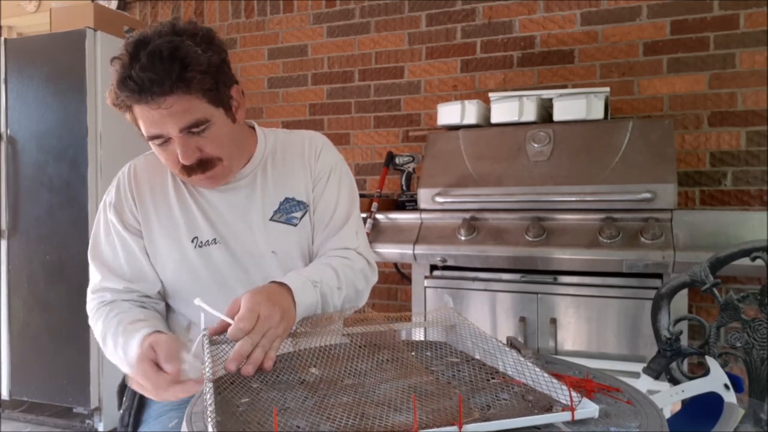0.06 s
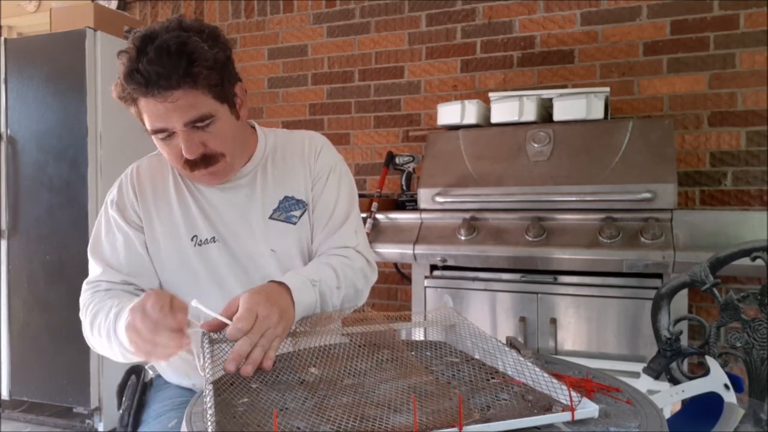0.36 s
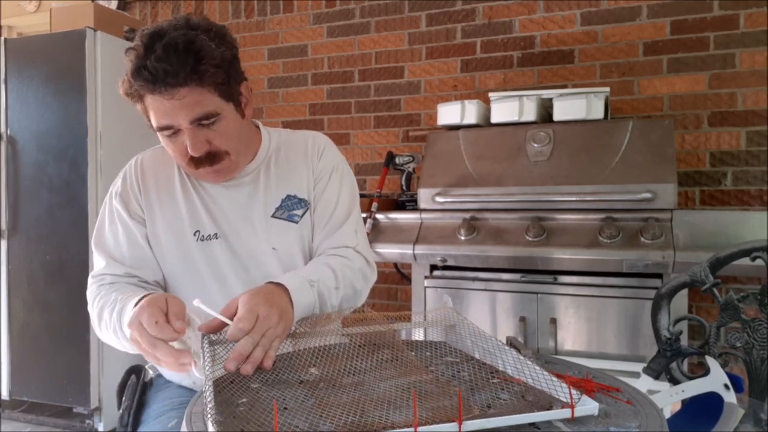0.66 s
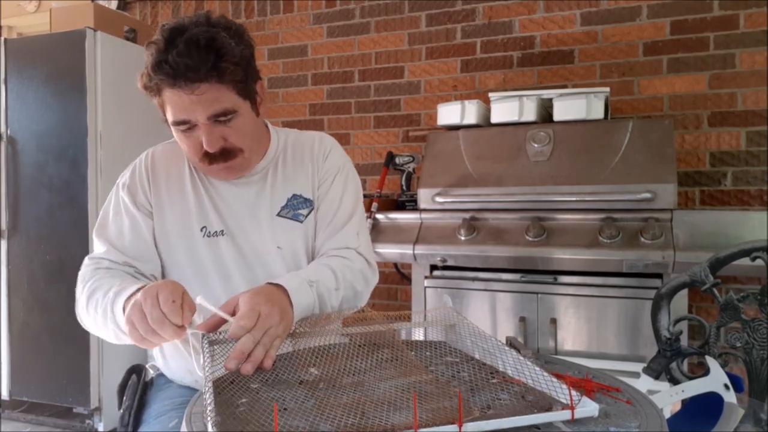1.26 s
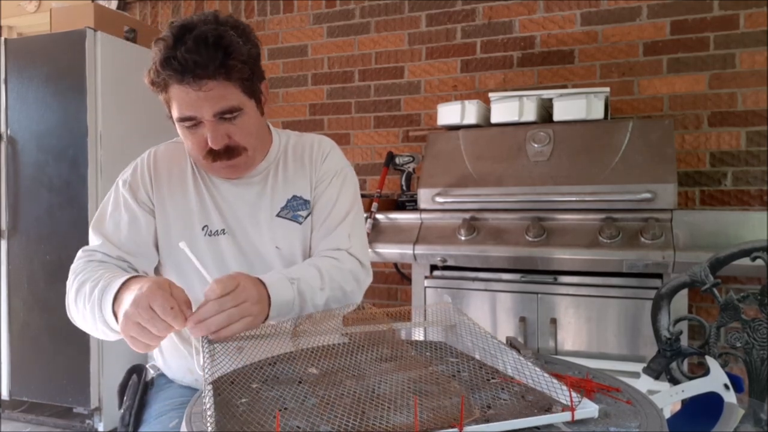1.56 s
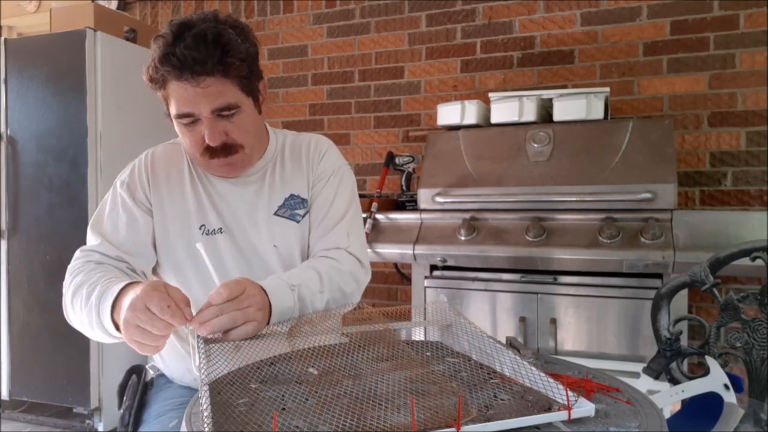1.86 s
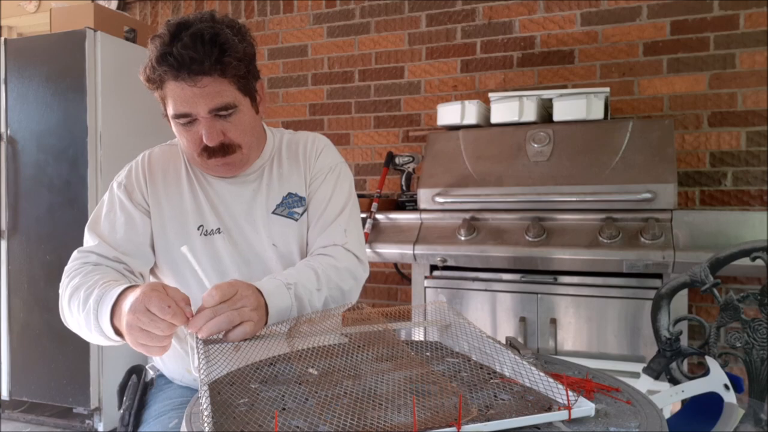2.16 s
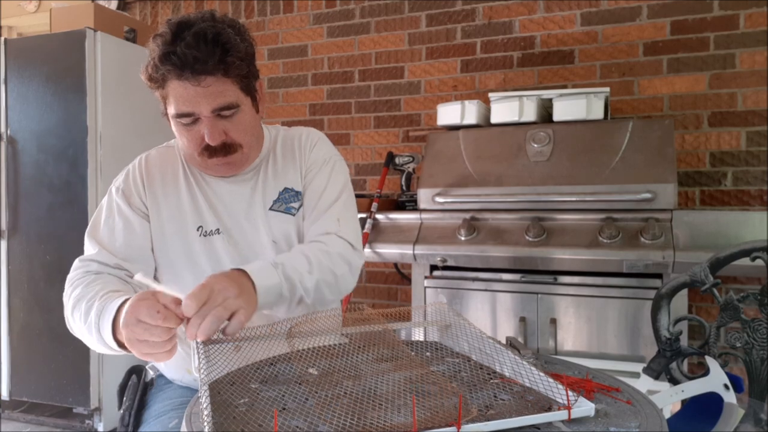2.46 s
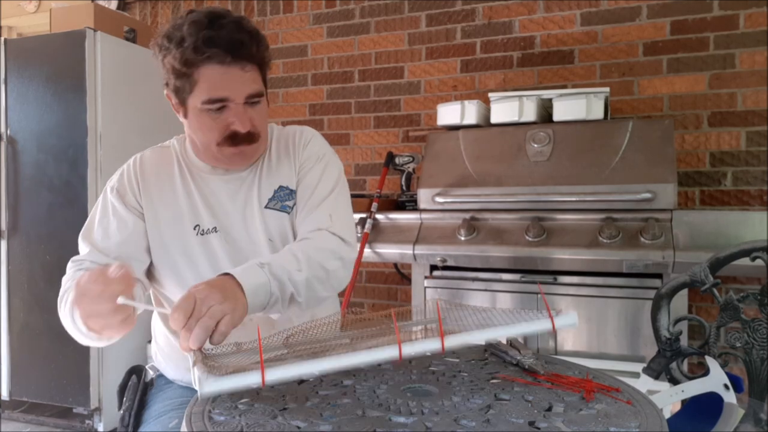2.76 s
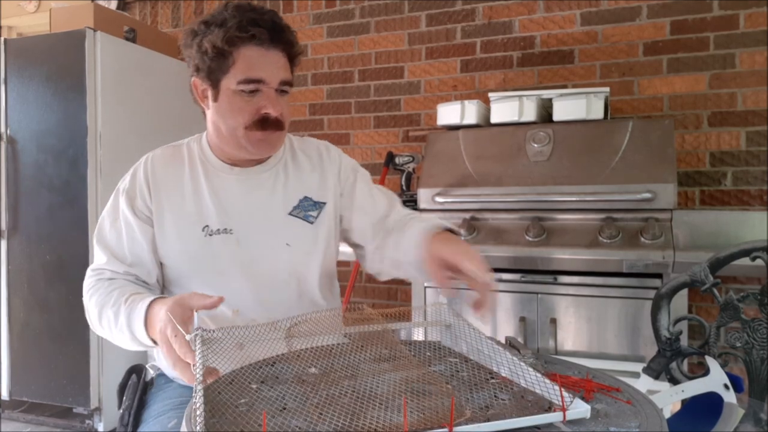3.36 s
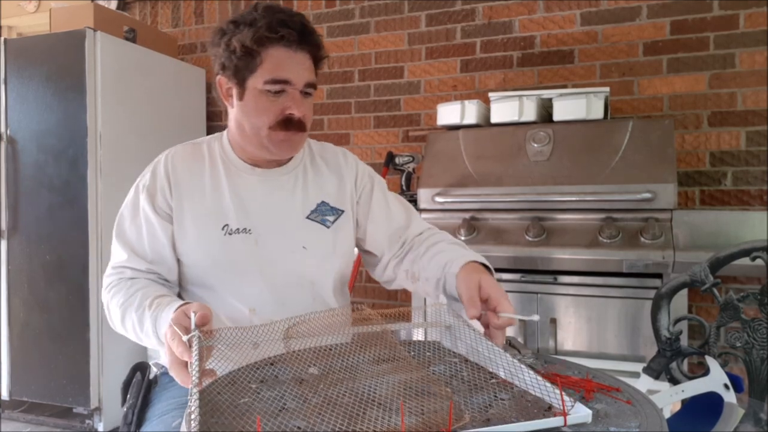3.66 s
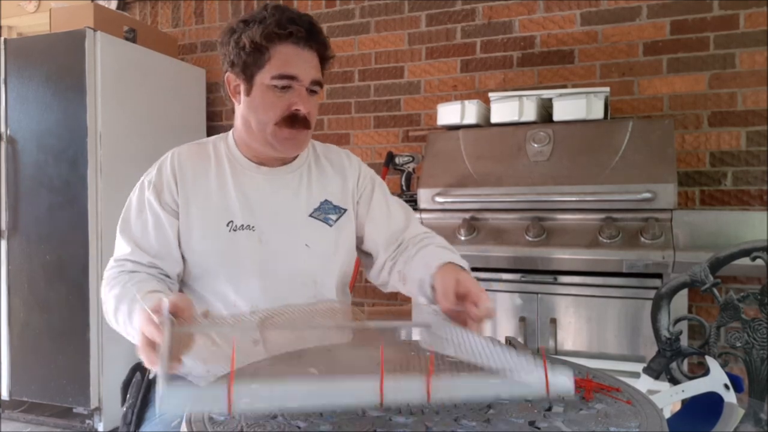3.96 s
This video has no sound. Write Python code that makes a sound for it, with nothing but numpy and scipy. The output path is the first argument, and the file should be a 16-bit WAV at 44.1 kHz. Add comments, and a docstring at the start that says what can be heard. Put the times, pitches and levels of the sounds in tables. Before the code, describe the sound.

On a patio with a low hum and a faint bird, a plastic cable tie is zipped, fiddled with and ratcheted tight nearby. The wire-mesh rack it holds then clatters loudly onto a table and settles with small knocks.

```python
"""First come light ticks of fingers on a plastic cable tie, then a quick zip as it closes round a
wire-mesh rack on a brick-walled patio. After more fiddling it is pulled tight: its catch snaps over
one tooth at a time and shakes the mesh. The rack is lifted, drops back on its table with a loud,
ringing clatter and settles in a few small knocks. Behind it all are outdoor air, a humming appliance
and, early on, a faint bird."""
import sys
import numpy as np
from scipy import signal
from scipy.fft import rfft, irfft
from scipy.io import wavfile

SR = 44100
rng = np.random.default_rng(int(sys.argv[2]) if len(sys.argv) > 2 else 0)


def materialize(psi):
    """Save the field psi as 16-bit PCM at rate SR to the path in sys.argv[1].

    A 1-D psi becomes a single channel; in a 2-D psi each row is a channel.
    """
    bounded = np.clip(np.atleast_2d(psi).T, -1, 1)
    quanta = np.round(bounded * 32767).astype(np.int16)
    wavfile.write(sys.argv[1], SR, quanta)


N = 176400
TIME = np.arange(N) / SR
RING_TIME = TIME[:SR * 3 // 5]

# Table levels are relative: later gains shift them. A ring_s or fade_s is the time to fall 60 dB.
# Tone of the outdoor air: pitch_hz, gain_db
AIR_TONE = [(25, -29.5), (42, -13.5), (58, 7), (85, -3), (125, -2.5), (210, -7), (300, -12), (700, -14.5),
            (1500, -20), (2400, -28), (3600, -37.5), (7000, -43.5), (12000, -44), (15500, -41)]
# The appliance's hum: pitch_hz, level_db
HUM_NOTES = [(58.8, -53), (119.6, -52), (182, -63.5)]
# Loudness of air and hum, dipping briefly after the drop: time_s, gain_db
BACKGROUND_LEVEL = [(0, -1), (2.9, 1), (3.3, 1.5), (3.58, -3), (3.8, 1.5), (4, -1)]
# A far bird's calls: start_s, length_s, start_hz, end_hz, level_db
BIRD_CALLS = [(.61, .12, 2080, 2620, -68), (.81, .1, 2150, 2400, -72), (.91, .06, 2350, 2050, -72)]

# The strap ticks against fingers and mesh: start_s, level_db
STRAP_TICKS = [(.003, -38), (.081, -39), (.115, -45), (.1765, -63), (.7936, -45.5), (1.462, -37.5),
               (1.513, -39.5), (1.5393, -28), (1.705, -38.5), (1.73, -37.5), (1.8787, -39), (2.064, -39.5),
               (2.152, -48)]
# Tone of the ticks: pitch_hz, gain_db
TICK_TONE = [(300, -16), (700, -9), (1500, -4), (3500, 2), (7500, 4.5), (11500, 4), (15500, -6)]
# Fingers rub on plastic and wire: time_s, level_db
RUB_LEVEL = [(0, -66), (.2, -57), (.6, -73.5), (.8, -60.5), (1.05, -79), (1.28, -74), (1.45, -64),
             (1.65, -59), (1.82, -63.5), (2.15, -66), (2.75, -63.5), (2.92, -57.5), (3.45, -90),
             (3.61, -86.5), (3.69, -51.5), (3.85, -59), (4, -66)]
# Tone of the rubbing: pitch_hz, gain_db
RUB_TONE = [(200, -17.5), (1000, 0.5), (2500, 2.5), (5000, -1.5), (8000, -6.5), (12000, -4), (15500, -15)]

# The first quick pull, with the ring of the shrinking loop: time_s, teeth_per_s, level_db, loop_hz
ZIP_PULL = [(.236, 68, -37, 900), (.265, 90, -30.5, 830), (.30, 150, -31, 1010), (.33, 200, -29, 1800),
            (.38, 260, -29, 2500), (.42, 280, -29, 3020), (.445, 220, -30.5, 4570), (.47, 130, -63, 4400),
            (.50, 80, -69, 4500)]
# Tone of the zip: pitch_hz, gain_db
ZIP_TONE = [(120, -8.5), (190, 2.5), (400, -16), (800, -6), (1100, -7.5), (1700, -2), (3000, -3),
            (5500, -7.5), (8000, -8), (11500, -5.5), (15500, -29)]
# Notes of the mesh held taut by the strap: pitch_hz, level_db, ring_s
MESH_NOTES = [(520, -11, .2), (770, -2, .22), (1420, -2, .22), (1584, 0, .22), (1825, 0, .2),
              (2002, -3, .2), (2521, -2, .16), (2988, 0, .15), (3826, -1, .18), (4440, 1, .11)]
# The catch snaps over single teeth: start_s, level_db
TOOTH_SNAPS = [(2.2102, -23), (2.2366, -17.5), (2.2877, -29), (2.3308, -18.5), (2.351, -19.5),
               (2.3848, -15), (2.4142, -13.5), (2.4327, -20), (2.4655, -14), (2.5086, -14), (2.5355, -16.5),
               (2.5528, -13)]
# The strap creeps and rasps between snaps: time_s, level_db
RASP_LEVEL = [(2.284, -60.5), (2.289, -24.5), (2.315, -35), (2.345, -39), (2.375, -55.5), (2.425, -25),
              (2.475, -55.5), (2.505, -63), (2.545, -26), (2.575, -65.5)]
# Tone of the snaps and the rasp: pitch_hz, gain_db
SNAP_TONE = [(300, -17), (1000, -15.5), (2500, -11.5), (5000, -11.5), (7500, -7.5), (9800, -5.5),
             (11700, 2), (13500, -7.5), (15500, -7.5)]

# The rack hits the table: start_s, level_db, bass_db, treble_db
RACK_HITS = [(2.632, -38, 4, 4), (2.6635, -32.5, -6.5, -1), (2.8104, -70, -3, 2), (2.8303, -35, -12, -4.5),
             (2.9695, -18.5, 12.5, -5), (2.976, -13.5, 8, 2.5), (2.982, -6, -1, -0.5),
             (2.999, -9.5, 4.5, -1), (3.013, -16.5, -6, 9.5), (3.0275, -8.5, -9, -2), (3.039, -12, -2, 3),
             (3.061, -25, -1, 12.5), (3.170, -26.5, -0.5, -2.5), (3.2084, -25, 0, -1.5),
             (3.2184, -25.5, -1, -3.5), (3.3287, -29, -3, -2.5), (3.352, -35, 4, 0.5),
             (3.697, -33, 10.5, -9), (3.7113, -28.5, 4.5, -1), (3.74, -42, 20, 6)]
BASS_HZ, MIDDLE_HZ, TREBLE_HZ = 460, 2000, 7000
# Notes of the rack's frame: pitch_hz, level_db, ring_s
FRAME_NOTES = [(541, -6, .24), (634, -9, .2), (933, -5, .22), (1206, -3, .22), (1494, -6, .2),
               (1580, -4, .22), (1655, -5, .2), (1746, -1, .24), (1909, 1, .21), (1985, 1, .22),
               (2370, -4, .2), (2879, -5, .24), (2937, -2, .24), (3471, -6, .24), (3823, -9, .2),
               (4014, -11, .2), (4840, -11, .22), (5682, -13, .22)]
# Tone of the rattling mesh: pitch_hz, gain_db
RATTLE_TONE = [(90, -37.5), (170, -5), (260, -18), (340, -9.5), (520, -4), (740, -5.5), (950, -9),
               (1300, 0), (1800, -4), (3000, -3.5), (4800, -11.5), (6200, -18), (8000, -21.5),
               (11600, -20.5), (15500, -34)]
# Low notes of the table's thud: pitch_hz, level_db, ring_s
TABLE_NOTES = [(127.4, -13.5, 0.056), (164, 7, 0.16), (207, 0, 0.17)]

# How alike the left and right sides are: pitch_hz, likeness (0 to 1)
STEREO_LIKENESS = [(60, .93), (150, 0.89), (300, 0.75), (640, 0.26), (1400, 0), (3000, 0), (15000, 0)]
# How long the patio's reverb lasts: pitch_hz, fade_s
REVERB_FADE = [(150, 0.27), (1000, 0.24), (3000, 0.25), (8000, 0.18), (15000, 0.17)]
# Echoes off table and wall: delay_s, level_db (against the reverb)
NEAR_ECHOES = [(.0035, -14.5), (.0073, -17), (.011, -25.5)]
AIR_PAN_DB, REVERB_PAN_DB, RACK_PAN_DB, SNAP_PAN_DB = -3.5, -2, -7, -12  # below 0 is to the right
TOP_HZ = 16000


def from_db(db):
    """Turn decibels into a number to multiply by."""
    return 10 ** (np.asarray(db) / 20)


def unit(x):
    """Scale a sound so its channels have an average energy of 1."""
    return x / np.sqrt(np.mean(np.sum(x ** 2, axis=-1)) + 1e-20)


def pan(db):
    """Left and right gains that differ by db."""
    return from_db(np.array([[db], [-db]]) / 2)


def at_time(rows, t=TIME):
    """Read each column of a time table at t, gliding between rows."""
    times, *columns = np.transpose(rows)
    return [np.interp(t, times, column) for column in columns]


def at_hz(points, hz):
    """Read a pitch table at hz, with octaves evenly spaced."""
    pitches, values = np.transpose(points)
    return np.interp(np.log(np.maximum(hz, 1)), np.log(pitches), values)


def shaped_click(db_of_hz):
    """A click with the given tone and its energy as early as possible (minimum phase)."""
    size = 4096
    gains = from_db(db_of_hz(np.fft.rfftfreq(size, 1 / SR)))
    cepstrum = irfft(np.log(gains))
    cepstrum[1:size // 2] *= 2
    cepstrum[size // 2 + 1:] = 0
    return irfft(np.exp(rfft(cepstrum)))


def through(x, response):
    """Filter a sound through a response (convolution), keeping its length."""
    x = np.atleast_2d(x)
    return signal.fftconvolve(x, np.atleast_2d(response), axes=-1)[:, :x.shape[-1]]


def with_tone(x, points):
    """Give a sound a tone; white noise keeps its power."""
    return through(x, unit(shaped_click(lambda hz: at_hz(points, hz))))


def add(track, start_s, sound):
    """Mix a sound into a track."""
    start = max(int(start_s * SR), 0)
    part = track[..., start:start + sound.shape[-1]]
    part += sound[..., :part.shape[-1]]


def contact(decay_s):
    """Two things touch: a burst of tiny slips that dies quickly."""
    t = TIME[:SR // 20]
    return unit(rng.standard_normal(len(t)) * np.exp(-t / decay_s))


def crackle(per_s):
    """Random clicks of uneven size, with an average power of 1."""
    return unit((rng.random(N) < per_s / SR) * rng.standard_normal(N)) * np.sqrt(N)


def note(hz, ring_s, phase=0):
    """One pure note dying away."""
    return np.sin(2 * np.pi * hz * RING_TIME + phase) * from_db(-60 * RING_TIME / ring_s)


def ringing(notes):
    """An object's notes in stereo; higher ones differ more between left and right."""
    sound = 0
    for hz, db, ring_s in notes:
        gain = from_db(db) * rng.choice([-1, 1])
        phases = (1 - at_hz(STEREO_LIKENESS, hz)) * rng.uniform(-np.pi, np.pi, (2, 1)) / 2
        sound += gain * note(hz, ring_s, phases)
    return unit(sound)


def shaken(force, notes):
    """A force sets an object ringing; each note takes its share of the energy."""
    force, out = np.ravel(force), np.zeros((2, N))
    first, last = np.flatnonzero(force)[[0, -1]]
    push = force[first:last + len(RING_TIME)]
    shares = unit(from_db([db for hz, db, ring_s in notes]))
    for share, row in zip(shares, notes):
        add(out, first / SR, share * unit(through(push, ringing([row]))))
    return np.sqrt(np.sum(force ** 2)) * out * pan(RACK_PAN_DB)


def wide_noise(size):
    """Stereo noise whose sides are alike in the bass and unrelated in the treble."""
    mid, side = rfft(rng.standard_normal((2, size)))
    alike = at_hz(STEREO_LIKENESS, np.fft.rfftfreq(size, 1 / SR))
    return irfft(np.sqrt((1 + alike) / 2) * mid + np.sqrt((1 - alike) / 2) * side * [[1], [-1]], size)


def patio(x, reverb_db, pan_db=RACK_PAN_DB):
    """A sound arrives directly, then as three near echoes and a short reverb."""
    hz, t, bands = signal.stft(wide_noise(len(RING_TIME)), SR, nperseg=256)
    fade = from_db(-60 * t / at_hz(REVERB_FADE, hz)[:, None])
    tail = unit(signal.istft(bands * fade, SR)[1])
    for delay_s, db in NEAR_ECHOES:
        for side in tail:
            add(side, delay_s * rng.uniform(.9, 1.1), from_db([db]))
    response = from_db(reverb_db) * tail * pan(REVERB_PAN_DB)
    response[:, :1] += pan(pan_db)  # the direct sound
    return through(x, unit(response))


def air_and_hum():
    """Outdoor air and an appliance's slightly wavering hum."""
    out = from_db(-48) * with_tone(wide_noise(N), AIR_TONE)
    for hz, db in HUM_NOTES:
        swell, drift = .3 * signal.resample(rng.standard_normal((2, 20)), N, axis=1)
        out += np.sqrt(2) * from_db(db) * (1 + swell / 2) * np.sin(2 * np.pi * hz * TIME + drift)
    return out * from_db(at_time(BACKGROUND_LEVEL)[0]) * pan(AIR_PAN_DB)


def bird():
    """Faint gliding whistles, blurred by distance."""
    song = np.zeros(N)
    for start_s, length_s, start_hz, end_hz, db in BIRD_CALLS:
        progress = np.linspace(0, 1, int(length_s * SR))
        swell = np.sqrt(np.abs(np.sin(np.pi * progress)))
        pitch_hz = start_hz + (end_hz - start_hz) * progress
        add(song, start_s, from_db(db) * swell * np.sin(2 * np.pi * np.cumsum(pitch_hz) / SR))
    return patio(song, reverb_db=-1)


def fingers():
    """The strap ticks against fingers and mesh while the fingers rub on plastic and wire."""
    ticks = np.zeros(N)
    for start_s, db in STRAP_TICKS:
        add(ticks, start_s, from_db(db + 15) * contact(decay_s=.0034))
    rub = from_db(at_time(RUB_LEVEL)[0]) * crackle(per_s=900)
    return patio(with_tone(ticks, TICK_TONE) + with_tone(rub, RUB_TONE), reverb_db=12)


def zip_pull():
    """Teeth race past the catch; the loop rings higher as it shrinks and shakes the mesh."""
    teeth, loop = np.zeros((2, N))
    time_s = ZIP_PULL[0][0]
    while time_s < ZIP_PULL[-1][0]:
        teeth_per_s, db, loop_hz = at_time(ZIP_PULL, time_s)
        add(teeth, time_s, from_db(db) * contact(decay_s=.0018))
        ping = unit(note(loop_hz, ring_s=.0021))
        add(loop, time_s, rng.choice([-1, 1]) * from_db(db - 7.5) * ping)
        time_s += rng.uniform(.85, 1.15) / teeth_per_s
    mesh = from_db(-1) * shaken(loop + from_db(-3) * teeth, MESH_NOTES)
    strap = patio(with_tone(teeth + loop, ZIP_TONE), reverb_db=9.5)
    return from_db(19) * (strap + mesh)


def catch_click(length_s=.0008):
    """One click of the catch, smeared by the strap so its treble arrives first."""
    t = TIME[:SR // 200]
    progress = np.minimum(t / length_s, 1)
    falling_tone = np.cos(2 * np.pi * TOP_HZ * t * (1 - progress / 2))
    return unit(falling_tone * np.sqrt(1 - progress))


def tighten():
    """The last teeth snap past one by one and shake the mesh while the tight strap rasps."""
    snaps = np.zeros(N)
    for start_s, db in TOOTH_SNAPS:
        add(snaps, start_s, from_db(db + 15.5) * catch_click())
    creeping = (TIME > RASP_LEVEL[0][0]) * (TIME < RASP_LEVEL[-1][0])
    rasp = from_db(at_time(RASP_LEVEL)[0]) * crackle(per_s=1100) * creeping
    mesh = from_db(-22) * shaken(snaps, MESH_NOTES)
    clicks = patio(with_tone(snaps, SNAP_TONE), reverb_db=4.5, pan_db=SNAP_PAN_DB)
    return clicks + patio(with_tone(rasp, SNAP_TONE), reverb_db=10) + mesh


def rack_clatter(thud_s=2.974, lowest_hz=124.5):
    """Each hit rings the frame and rattles the mesh; the drop also makes the table thud."""
    hits, rattle = np.zeros((2, 1, N))
    for start_s, db, bass_db, treble_db in RACK_HITS:
        tone = [(BASS_HZ, bass_db), (MIDDLE_HZ, 0), (TREBLE_HZ, treble_db)]
        hit = from_db(db) * shaped_click(lambda hz: at_hz(tone, hz))
        add(hits, start_s, rng.choice([-1, 1]) * hit)
        add(rattle, start_s, through(contact(decay_s=.0058), hit))
    clatter = from_db(17) * shaken(hits, FRAME_NOTES)
    add(clatter, thud_s, from_db(6) * ringing(TABLE_NOTES))
    clatter += from_db(21) * patio(with_tone(rattle, RATTLE_TONE), reverb_db=10)
    return signal.sosfilt(signal.butter(4, lowest_hz, "high", fs=SR, output="sos"), clatter)


def scene():
    """All the sounds together."""
    return air_and_hum() + rack_clatter() + tighten() + fingers() + zip_pull() + bird()


def record(dry):
    """The microphone dulls a narrow band of treble; peaks are rounded and the very top is cut."""
    dip_hz, width_hz, dip_db, ceiling = 8840, 460, -16, .9
    dip = shaped_click(lambda hz: dip_db * np.exp(-.5 * ((hz - dip_hz) / width_hz) ** 2))
    heard = through(dry, dip)
    rounded = heard / (1 + (heard / ceiling) ** 6) ** (1 / 6)
    return signal.sosfilt(signal.ellip(10, .3, 70, TOP_HZ, fs=SR, output="sos"), rounded)


dry = scene()
out = record(dry)
materialize(out)
```